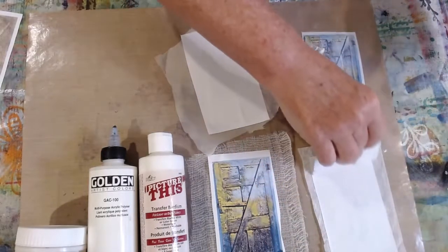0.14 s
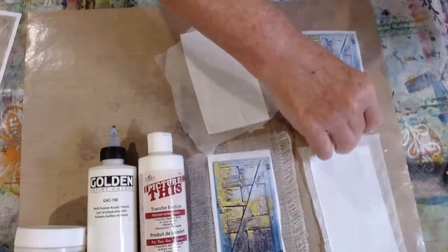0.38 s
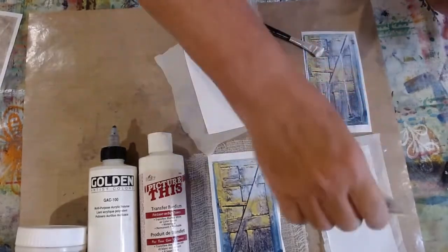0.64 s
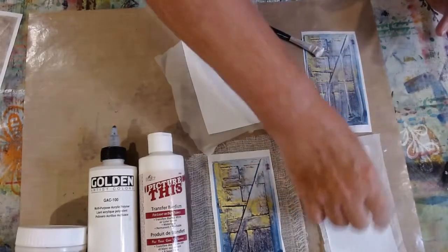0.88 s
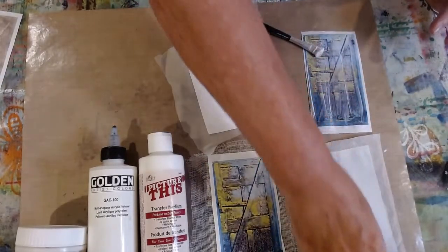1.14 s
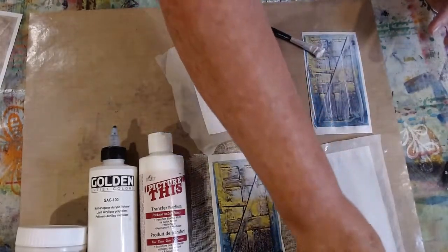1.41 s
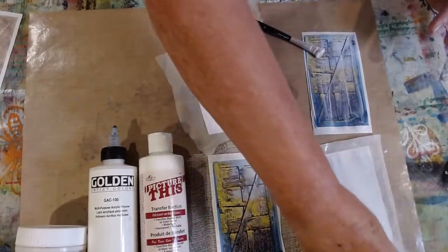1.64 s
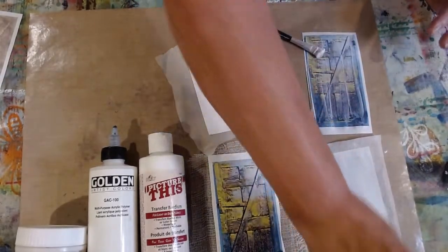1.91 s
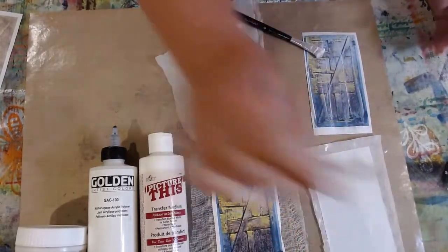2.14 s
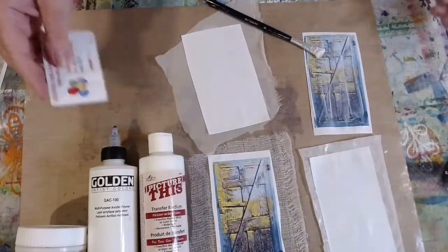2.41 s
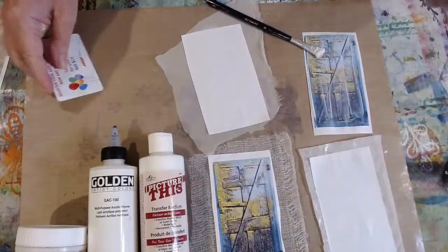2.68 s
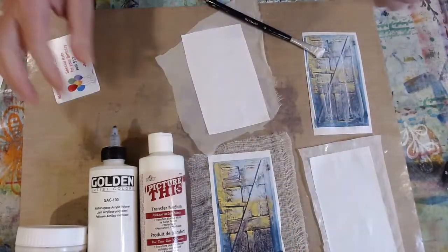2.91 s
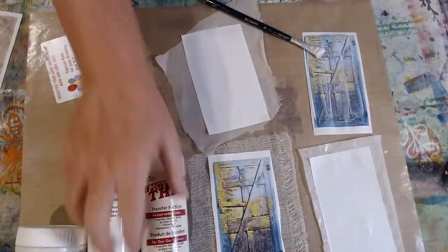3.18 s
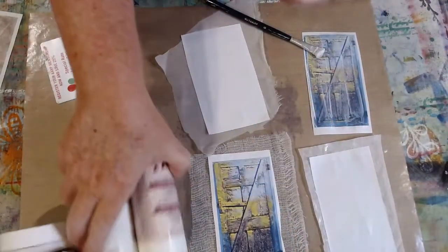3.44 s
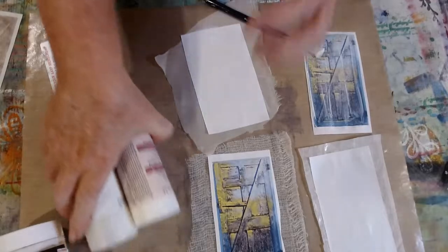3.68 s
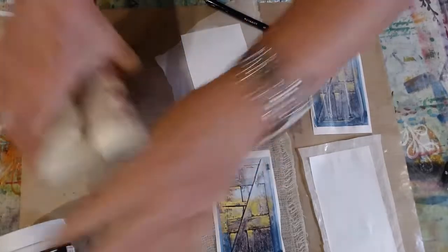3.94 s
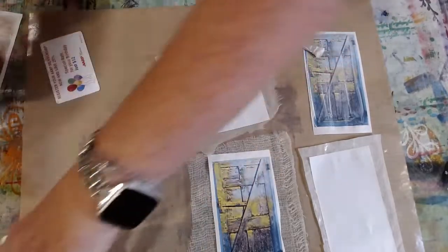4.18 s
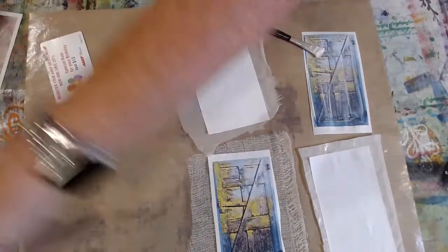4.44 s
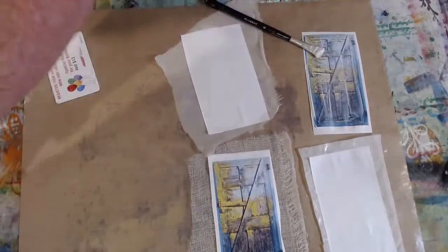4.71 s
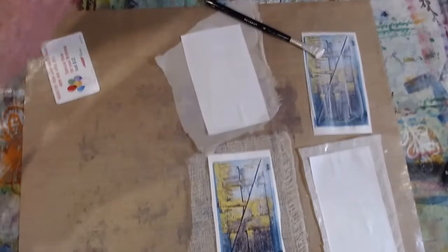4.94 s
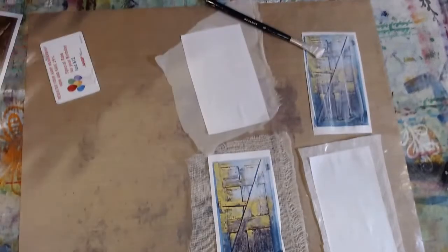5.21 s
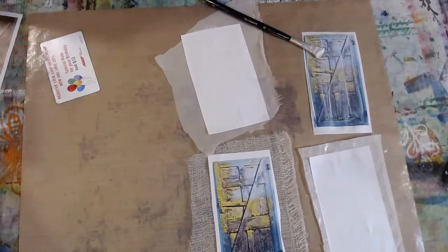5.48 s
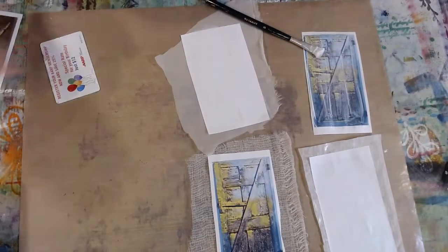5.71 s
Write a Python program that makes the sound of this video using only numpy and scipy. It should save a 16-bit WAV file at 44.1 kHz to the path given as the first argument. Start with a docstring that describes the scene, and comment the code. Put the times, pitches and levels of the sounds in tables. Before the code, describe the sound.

Four brief raspy rubs on paper, small clicks between, then a metallic-edged rustle and soft thuds as things are moved, over a steady air-conditioner rumble.

```python
"""Throughout, an air conditioner gives a very low shaft tone, a wavering hum and a rush of air.
From 0.4 to 3.5 s a plastic card is drawn over paper on a craft table in four strokes: noisy catches
drive the modes of card, table and sheet. Hands, bottles and a bracelet rustle (noise swells) and tick
(short damped modes) around and after them; from 4.7 s things are dragged and knock on the table.
A short room tail follows the hands; the microphone falls off steeply near 8 kHz."""
import sys
import numpy as np
from scipy import signal
from scipy.fft import rfft, irfft, next_fast_len
from scipy.io import wavfile
from scipy.ndimage import uniform_filter1d, map_coordinates

SR = 44100
rng = np.random.default_rng(int(sys.argv[2]) if len(sys.argv) > 2 else 0)


def attenuation_scalar(level_db):
    """Turn a level in dB into a linear amplitude multiplier (20 dB per decade)."""
    decades = np.asarray(level_db, float) / 20
    return 10 ** decades


def materialize(psi):
    """Save the field psi as 16-bit PCM at rate SR to the path in sys.argv[1].

    A 1-D psi becomes a single channel; in a 2-D psi each row is a channel.
    """
    bounded = np.clip(np.atleast_2d(psi).T, -1, 1)
    quanta = np.round(bounded * 32767).astype(np.int16)
    wavfile.write(sys.argv[1], SR, quanta)


N = 257531

# Modes of the rubbed table top. Each row: centre in Hz, nominal width in Hz, relative level in dB.
TABLE_MODES = [(790, 410, 6.5), (1135, 280, 9), (1640, 53, -12)]


def unit(x):
    """Scaled to rms 1."""
    return x / np.sqrt(np.mean(x ** 2) + 1e-20)


def along(points, hz):
    """(Hz, value) points interpolated on a log frequency axis."""
    f, v = np.transpose(points)
    return np.interp(np.log(hz + 1), np.log(f + 1), v)


def wobble(knots_per_s):
    """A smooth random curve through normal random knots."""
    knots = rng.standard_normal(int(N * knots_per_s / SR) + 4)
    return map_coordinates(knots, [np.arange(N) * knots_per_s / SR])


def filtered(x, response):
    """x times a response of frequency."""
    m = next_fast_len(N + 8192)
    return irfft(rfft(x, m) * response(np.fft.rfftfreq(m, 1 / SR)), m)[..., :N]


def resonance(hz, centre_hz, width_hz):
    """Complex response of one mode, 1 at its centre."""
    return 1j * hz * width_hz / (centre_hz ** 2 - hz ** 2 + 1j * hz * width_hz)


def body(modes):
    """Response of several modes, their powers added."""
    return lambda hz: np.sqrt(sum(np.abs(attenuation_scalar(db) * resonance(hz, c, w)) ** 2 for c, w, db in modes))


def ring(hz, t60_s, t, attack_s):
    """One damped mode with a soft attack."""
    return np.sin(2 * np.pi * hz * t) * attenuation_scalar(-60 * t / t60_s) * (1 - np.exp(-t / attack_s))


def grit(per_s, spread_db, smooth):
    """Fibres catching the edge: dense impulses of uneven size on smooth noise."""
    size_db = spread_db * np.minimum(rng.exponential(size=N), 3)
    hits = (rng.random(N) < per_s / SR) * attenuation_scalar(size_db)
    return smooth * rng.standard_normal(N) + unit(hits * rng.standard_normal(N))


def columns(tables):
    """A gate open inside the tables, with 4 ms edges, then one value per sample for each column."""
    t, rows = np.arange(N) / SR, np.concatenate(tables)
    gate = sum(np.clip(np.minimum(t - r[0][0], r[-1][0] - t) / 0.004, 0, 1) for r in tables)
    return [gate] + [np.interp(t, rows[:, 0], c) for c in rows[:, 1:].T]


def patches(shape, patchy_db):
    """Random gain over frequency and time, smoothed mostly along time."""
    field = uniform_filter1d(rng.standard_normal(shape), size=2, axis=0)
    field = uniform_filter1d(field, size=24, axis=1)
    return attenuation_scalar(patchy_db * unit(field))


def gliding(x, modes, bend, patchy_db):
    """x through modes whose pitch follows the bend, every moment at equal filter power; rms 1."""
    hz, t, z = signal.stft(x, SR, nperseg=512, noverlap=384)
    bend = np.interp(t, np.arange(N) / SR, bend)
    # exponent above 2 sharpens the modes
    power = sum(attenuation_scalar(2 * db) * np.abs(resonance(hz[:, None], centre * bend, width)) ** 2.6
                for centre, width, db in modes)
    gain = np.sqrt(power / power.mean(axis=0)) * patches(z.shape, patchy_db)
    return unit(signal.istft(z * gain, SR, nperseg=512, noverlap=384)[1][:N])


def rubbing():
    """One stream of catches drives the card, the table and the sheet; the grip bends and stops the card."""
    # Press in each stroke, one list a stroke. Each row: time in seconds, level in dB.
    press = [
        [(0.44, -96), (0.458, -64.5), (0.582, -50), (0.608, -51), (0.804, -49.5), (0.992, -53), (1.036, -49),
         (1.054, -50), (1.074, -67), (1.12, -75)],
        [(1.535, -85), (1.557, -55), (1.589, -48), (1.853, -54.5), (1.959, -46), (1.965, -49.5), (1.995, -48),
         (2.019, -71), (2.07, -72)],
        [(2.48, -84), (2.504, -64.5), (2.536, -55.5), (2.566, -54), (2.908, -55.5), (2.926, -53.5),
         (2.992, -52.5), (3.01, -64.5), (3.078, -89), (3.08, -83)],
        [(3.24, -49), (3.248, -69), (3.294, -57.5), (3.308, -58.5), (3.406, -50), (3.432, -66.5), (3.5, -84)],
    ]
    # Grip per stroke. Each row: time the card digs in to stop in seconds, then shares in dB of its
    # low modes, its stiff edge, the table, the paper.
    grip = [(1.033, -3.5, -1, -7, -4.5), (1.977, -13, -0.5, -10, -10), (2.984, -11, -4.5, -8, -4.5),
            (3.394, -2, 0.5, -6, -7.5)]
    # Bend per stroke. Each row: pitch factor at the start, pitch factor at the stop.
    bend_factors = [(1.16, 1.21), (1.01, .99), (1.02, 1.3), (1.05, 1.1)]
    # Unbent card: finger-damped low modes, flexing mode, stiff edge modes; then the sheet under it.
    # Each row of the four: centre in Hz, nominal width in Hz, relative level in dB.
    held_modes = [(1330, 150, 0), (1550, 120, 0)]
    flex_modes = [(2270, 330, 0)]
    stiff_modes = [(2980, 280, 0), (3520, 330, -2.5), (4000, 350, -6)]
    sheet_modes = [(4780, 560, 0.9), (5470, 500, 0), (6070, 740, -0.77), (7040, 900, -3)]
    dig_s, dig_table_db, dig_paper_db = 0.021, 8.5, -1  # digging in loads the table, mutes the paper
    slowing_db_per_s = -13  # paper hiss fades as the hand slows
    flick_s, flick_db = 0.031, 6.5  # and flicks up when the card lifts
    patchy_db = 1.4

    shared = unit(grit(1500, 0.73, smooth=3.1)) * attenuation_scalar(1.2 * wobble(38.68))
    gate, press_db = columns(press)
    t = np.arange(N) / SR
    starts = np.array([rows[0][0] for rows in press])
    stroke = np.maximum(np.searchsorted(starts, t) - 1, 0)
    stop, held_db, stiff_db, table_db, paper_db = np.array(grip)[stroke].T
    first, last = np.array(bend_factors)[stroke].T
    since = t - starts[stroke]
    progress = np.clip(since / (stop - starts[stroke]), 0, 1)
    bend = first + (last - first) * progress ** 3  # changes late in the stroke
    dig = np.exp(-((t - stop) / dig_s) ** 2)
    flick = np.clip((t - stop) / flick_s, 0, 1)
    still = np.ones(N)

    card = gliding(shared, flex_modes, bend, patchy_db)
    card = unit(card + attenuation_scalar(stiff_db) * gliding(shared, stiff_modes, still, patchy_db))
    card = card + attenuation_scalar(held_db) * gliding(shared, held_modes, bend, patchy_db)

    table_db = table_db + dig_table_db * np.maximum(dig, t > stop) + 1.0 * wobble(25)
    table = attenuation_scalar(table_db) * gliding(shared, TABLE_MODES, still, patchy_db)

    paper_db = paper_db + slowing_db_per_s * since + dig_paper_db * dig + flick_db * flick
    hiss = attenuation_scalar(paper_db + 2.0 * wobble(30)) * gliding(shared, sheet_modes, still, patchy_db)
    return gate * attenuation_scalar(press_db) * (card + table + hiss)


def sliding(x, centre_hz, width_hz, patchy_db):
    """x through a moving resonance, sharpened by squaring, at rms 1."""
    hz, t, z = signal.stft(x, SR, nperseg=512, noverlap=384)
    centre_hz = np.interp(t, np.arange(N) / SR, centre_hz)
    gain = np.abs(resonance(hz[:, None], centre_hz, width_hz)) ** 2 * patches(z.shape, patchy_db)
    return unit(signal.istft(z * gain, SR, nperseg=512, noverlap=384)[1][:N])


def rustling():
    """A soft swish of many small catches; a drag also shakes the table."""
    # Hands, sleeves and bottles brushing things. Each row: start in seconds, length in seconds,
    # level in dB, centre in Hz, hiss share in dB.
    brushes = [(0.0, 0.054, -64.5, 2500, -34), (1.189, 0.065, -77.5, 3200, -3), (1.393, .08, -81, 2500, 4),
               (1.512, 0.022, -62, 2700, -6), (2.177, .09, -83, 2500, 6.5), (2.364, .08, -77.5, 2390, 5),
               (3.76, .04, -78.5, 2550, 8), (3.871, .06, -74, 2500, -1), (3.91, .09, -72.5, 3000, -10),
               (4.12, 0.25, -68.5, 2370, -13), (4.403, 0.4, -83, 2500, -0.5), (4.72, 0.16, -70, 3140, 0.5),
               (4.817, 0.32, -62, 3390, -3.5), (5.076, 0.14, -59, 2620, -6), (5.159, 0.21, -66.5, 2940, -2),
               (5.307, 0.29, -72.5, 2500, -2), (5.678, 0.11, -75, 2990, -0.5),
               (5.76, 0.13, -70.5, 2910, -7)]
    # Bottles dragged on the table. Each row: time in seconds, level in dB.
    drag = [(4.822, -62), (4.984, -55), (5.128, -58.5), (5.33, -62)]
    rise, fall = 0.35, 0.6  # shares of a brush
    patchy_db = 1.6

    shared = grit(1500, 2.8, smooth=1.4) * attenuation_scalar(1.5 * wobble(30))
    start, length, db, hz, hiss_db = np.transpose(brushes)[..., None]
    u = (np.arange(N) / SR - start) / length
    size = attenuation_scalar(db) * np.clip(np.minimum(u / rise, (1 - u) / fall), 0, 1)
    fidget = attenuation_scalar(-90.5 + 1.3 * wobble(15))  # the hands are never quite still
    level = size.sum(axis=0) + fidget
    centre_hz = ((size * hz).sum(axis=0) + fidget * hz.mean()) / level
    brush = level * sliding(shared, centre_hz, 1540, patchy_db)
    hiss_level = (size * attenuation_scalar(hiss_db)).sum(axis=0) + fidget
    hiss = hiss_level * sliding(shared, np.full(N, 5440), 3200, patchy_db)
    dragging, drag_db = columns([drag])
    shaken = unit(filtered(shared, body(TABLE_MODES)))
    return brush + hiss + dragging * attenuation_scalar(drag_db) * shaken


def faint_ticks():
    """Tick rows (time, snap dB, edge dB, edge Hz, wood dB), three a second, scattered by chance."""
    s, a, b = rng.random((round(3 * N / SR), 3)).T
    db = -59 + 8 * a
    return np.transpose([s * N / SR, db, db - 24, 3200 + 1600 * b, -5 + 0 * s])


def ticks():
    """Each tick is a few cycles: a dull snap, a bright edge of its own pitch and the table under it."""
    # Each row: time in seconds, snap gain in dB, edge level in dB rms over 4 ms, edge pitch in Hz,
    # wood share in dB relative to the snap gain.
    placed = [(0.4544, -41.5, -62, 4200, -10), (0.5721, -26, -52, 3490, -10.5),
              (1.0244, -30.5, -44, 3230, -2), (1.0331, -27.5, -50, 3270, -9.5),
              (1.0424, -31, -51, 3240, -5.5), (1.1263, -43.5, -72, 3380, -3.5),
              (1.1917, -38, -68, 3340, -11), (1.2765, -42, -76, 3530, -7),
              (1.3423, -41.5, -77, 3220, -19.5), (1.4057, -45, -78, 3400, -8),
              (1.4915, -48, -78, 3400, -14), (1.5165, -39, -66, 4300, -11), (1.9644, -30.5, -49, 3150, -13),
              (2.2727, -43, -73, 3400, -1), (2.4019, -35.5, -62, 3140, -15),
              (2.4598, -33.5, -66, 3580, -17), (2.4917, -39, -70, 4700, -6.5), (2.922, -33, -60, 2800, -13),
              (2.978, -47, -59, 3500, 9), (3.0724, -45, -77, 3230, -8), (3.1198, -45, -79, 3750, 0.5),
              (3.2355, -35.5, -62.5, 5150, 1.5), (3.3194, -40, -58, 3370, -12),
              (3.3822, -30.5, -49.5, 3360, 1.5), (3.4044, -37, -46.5, 3350, -7),
              (3.7579, -44.5, -65.5, 7530, -3.5), (4.1475, -41, -54.5, 2900, -15),
              (4.2974, -54, -68, 3950, -4), (4.7965, -28, -53, 3350, -20), (4.8184, -27.5, -52, 3080, -10),
              (4.8868, -38, -62, 4590, -17), (5.0818, -34, -57, 3300, -13), (5.1372, -35, -58, 3930, -7),
              (5.1756, -35.5, -64, 3410, -14), (5.2894, -53, -67, 3440, -11), (5.3204, -54, -60, 3560, -4),
              (5.3517, -38, -66, 5050, -21), (5.4164, -46, -65, 5770, 0), (5.438, -35, -59, 3170, -19),
              (5.5474, -56, -73, 3500, -4), (5.7364, -50, -57.5, 4620, -3), (5.7818, -41, -61, 2700, -18)]
    # Fingertip side of a tick. Each row: nominal pitch in Hz, nominal level in dB, t60 in seconds.
    snap_modes = [(1197, 8, 0.0049), (1750, -4, 0.0066), (2500, -14.5, 0.01)]

    out, t = np.zeros(N + SR), np.arange(2048) / SR
    rows = np.concatenate([placed, faint_ticks()])
    chance = rng.standard_normal((len(rows), 2, len(snap_modes)))
    for (s, db, bright_db, bright_hz, wood_db), (level, pitch) in zip(rows, chance):
        jitter_db, detune = 1.2 * level, 1 + 0.03 * pitch
        snap = sum(attenuation_scalar(mode_db + g) * ring(hz * p, t60, t, 0.00076)
                   for (hz, mode_db, t60), g, p in zip(snap_modes, jitter_db, detune))
        wood = attenuation_scalar(wood_db) * ring(721, 0.02, t, 0.00022)
        edge = ring(bright_hz, 0.0055, t, 0.00011) + 0.5 * ring(1.45 * bright_hz, 0.004, t, 0.0002)
        edge /= np.sqrt(np.mean(edge[:SR // 250] ** 2))  # rms 1 over 4 ms
        out[round(s * SR):][:len(t)] += attenuation_scalar(db) * (snap + wood) + attenuation_scalar(bright_db) * edge
    return out[:N]


def knocks():
    """Things set down: soft blows ring the low modes of the table board."""
    # Each row: time in seconds, gain in dB.
    blows = [(4.763, -44), (4.799, -30), (4.821, -34), (4.841, -45), (4.876, -57), (5.007, -34),
             (5.11, -40), (5.137, -37), (5.18, -44)]
    # Low modes of the board. Each row: pitch in Hz, relative level in dB, t60 in seconds.
    board = [(92.7, -10, 0.12), (139.4, -2, 0.11), (177, 1, .12), (244, -6, 0.07), (497, -15, 0.06)]

    out, t = np.zeros(N + SR), np.arange(SR // 3) / SR
    thud = sum(attenuation_scalar(db) * ring(hz, t60, t, attack_s=0.0025) for hz, db, t60 in board)
    for s, db in blows:
        out[round(s * SR):][:len(t)] += attenuation_scalar(db) * thud
    return out[:N]


def room(x):
    """Convolution with a noise tail in which each frequency dies at its own speed."""
    # Each row: frequency in Hz, t60 in seconds.
    decay = [(200, 0.63), (2000, 0.17), (8000, 0.038)]
    hz, t, z = signal.stft(rng.standard_normal(SR // 2), SR, nperseg=256)
    tail = signal.istft(z * attenuation_scalar(-60 * t / along(decay, hz)[:, None]), SR, nperseg=256)[1]
    late = np.pad(x, (300, 0))  # delay in samples
    return signal.fftconvolve(late, tail / np.linalg.norm(tail))[:N]


def conditioner():
    """Shaft tone of drifting pitch, motor hum as narrow noise bands, and shaped noise for the air."""
    # Shaft tone. Each row: time in seconds, pitch in Hz, level in dB rms before the flutter.
    shake = [(0.3, 21.56, -34.6), (0.7, 21.57, -34.7), (1.1, 21.57, -34.0), (1.5, 21.56, -34.6),
             (1.9, 21.63, -35.1), (2.3, 21.62, -35.5), (2.7, 21.53, -35.6), (3.1, 21.6, -35.7),
             (3.5, 21.65, -34.6), (3.9, 21.41, -34.3), (4.3, 21.34, -33.5), (4.7, 21.24, -34.3),
             (5.1, 21.44, -33.7), (5.5, 21.54, -34.3)]
    # Motor hum. Each row: centre in Hz, width in Hz, level in dB rms.
    hum_bands = [(59.9, 6.7, -55.5), (119.6, 6.4, -61), (168.1, 7.4, -60)]
    # Spectrum of the air. Each row: frequency in Hz, relative density in dB.
    air_shape = [(15, -14.5), (30, 0), (45, -6), (86, -10), (119, -2.5), (144, -8.5), (227, -12.5),
                 (294, -16), (483, -14), (625, -20.5), (810, -16.5), (1000, -24.5), (4750, -51.5),
                 (7800, -48), (10100, -91.5), (17200, -120)]

    t = np.arange(N) / SR
    s, hz, db = np.transpose(shake)
    phase = 2 * np.pi * np.cumsum(np.interp(t, s, hz)) / SR + 1.37
    flutter_db = 1.2 * wobble(5.9)
    shaft = np.sqrt(2) * attenuation_scalar(np.interp(t, s, db) + flutter_db) * np.cos(phase)
    hum = sum(attenuation_scalar(db) * unit(filtered(rng.standard_normal(N), lambda f: resonance(f, c, w)))
              for c, w, db in hum_bands)
    air = unit(filtered(rng.standard_normal(N), lambda f: attenuation_scalar(along(air_shape, f))))
    gusts = attenuation_scalar(0.6 * wobble(3))
    return shaft + hum + attenuation_scalar(-51.5) * gusts * air


def scene():
    """Hands close by with their room tail, the machine everywhere."""
    hands = rubbing() + rustling() + ticks() + knocks()
    return (hands + attenuation_scalar(-14.5) * room(hands) + conditioner())[None]


def band_limit(x):
    """A steep low-pass at the top of the band."""
    return signal.sosfilt(signal.butter(12, 8150, fs=SR, output="sos"), x)


def record(dry):
    """Narrow-band microphone: a steep fall near 8 kHz."""
    # Each row: frequency in Hz, gain in dB.
    mic_edge = [(7300, 0), (7800, -7), (8050, -14.5), (8200, -37)]
    mix = filtered(dry, lambda hz: attenuation_scalar(along(mic_edge, hz)))
    return band_limit(mix)


dry = scene()
out = record(dry)
materialize(out)
```